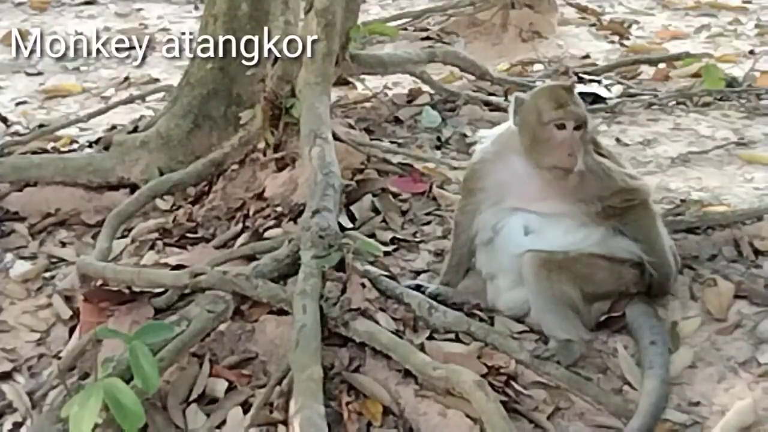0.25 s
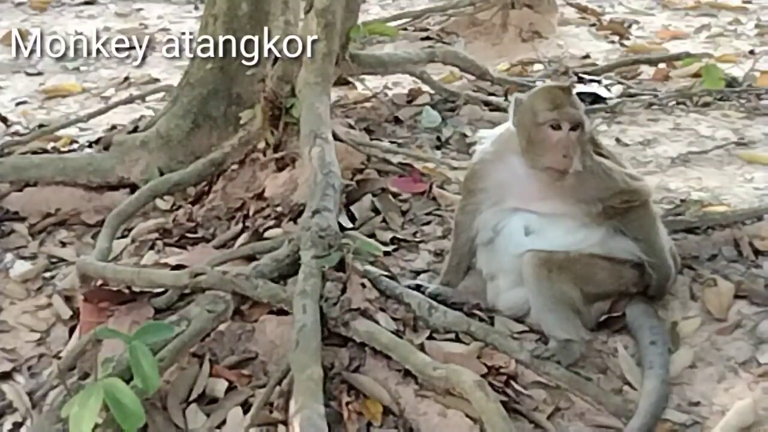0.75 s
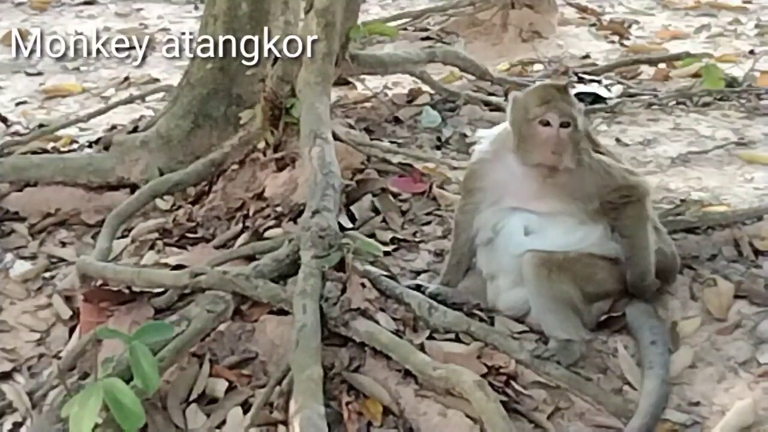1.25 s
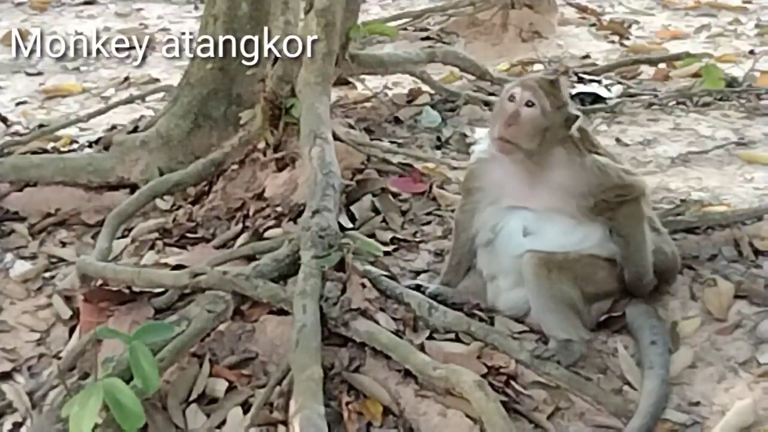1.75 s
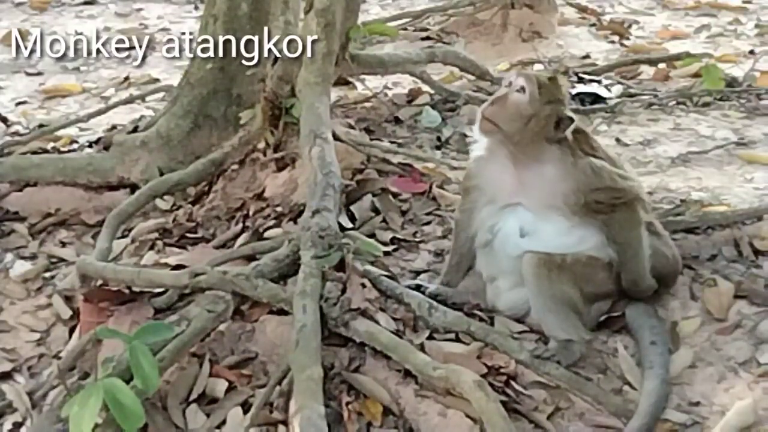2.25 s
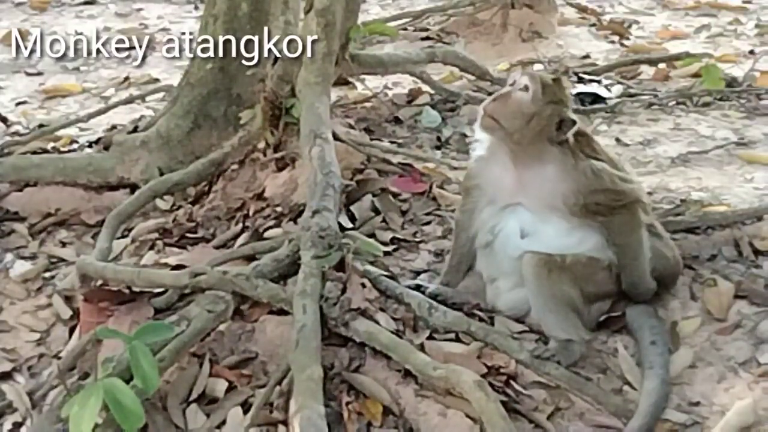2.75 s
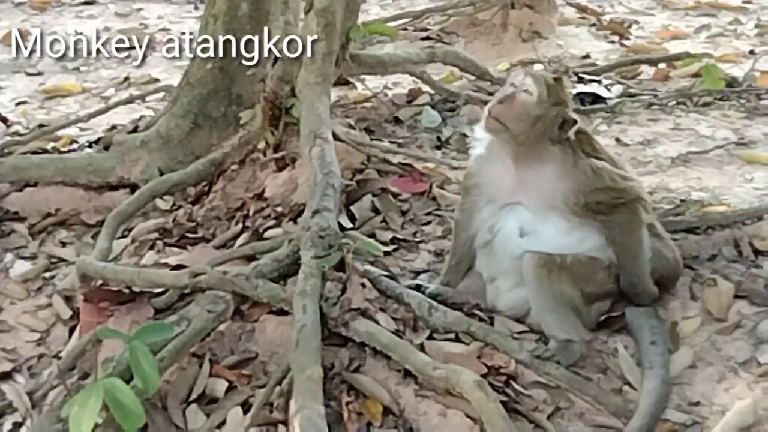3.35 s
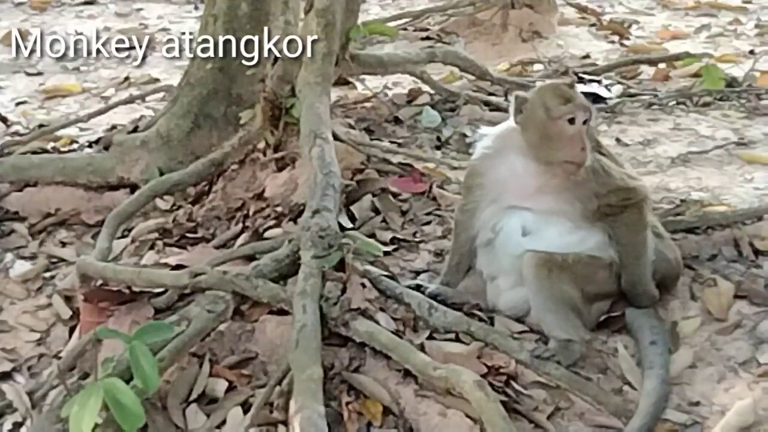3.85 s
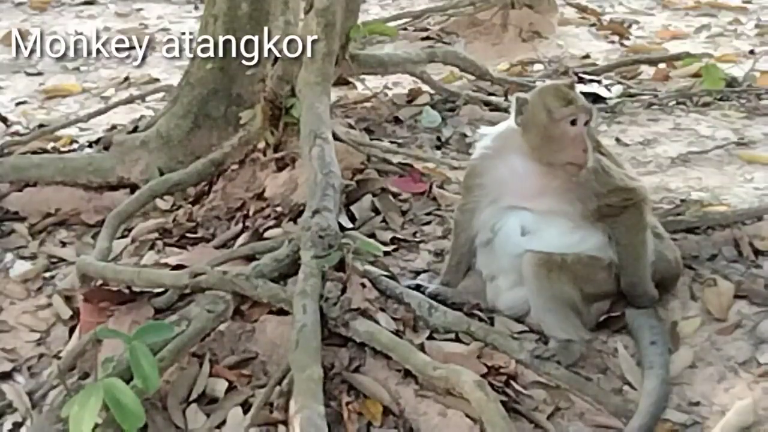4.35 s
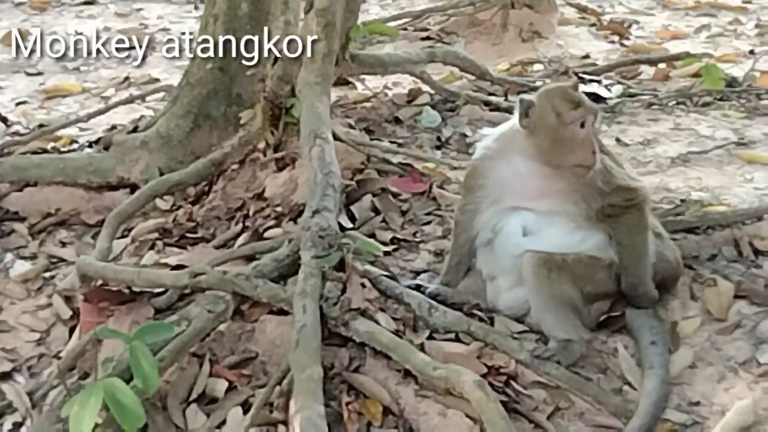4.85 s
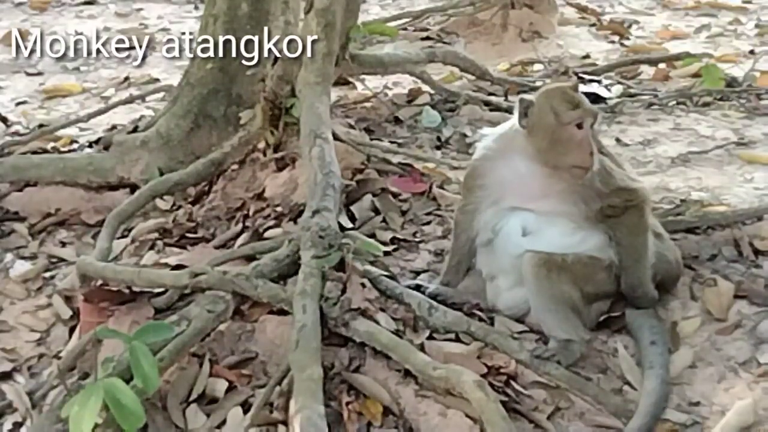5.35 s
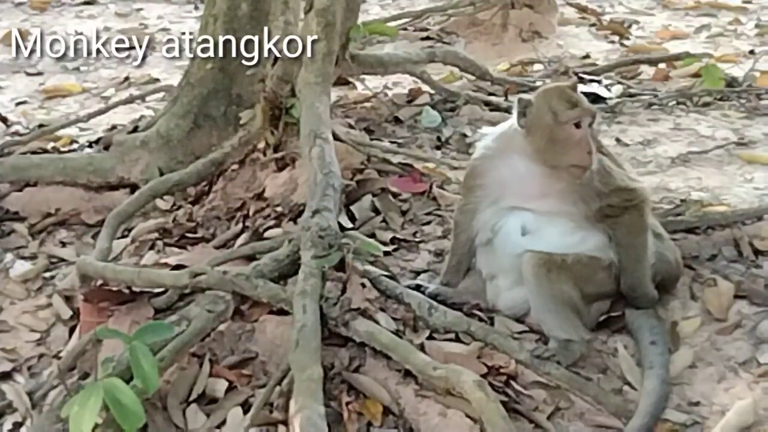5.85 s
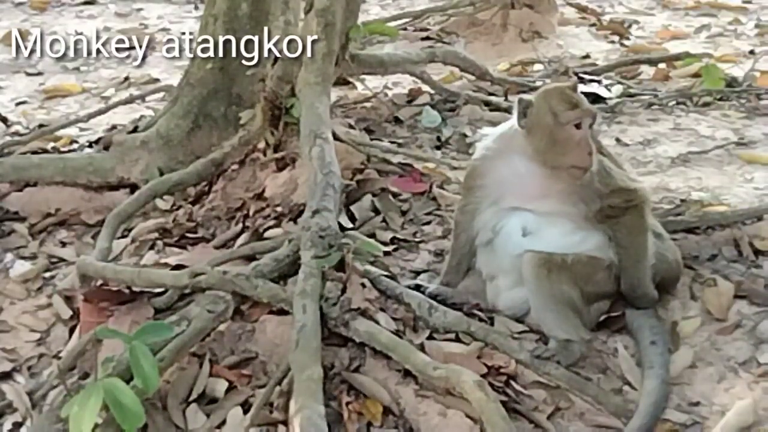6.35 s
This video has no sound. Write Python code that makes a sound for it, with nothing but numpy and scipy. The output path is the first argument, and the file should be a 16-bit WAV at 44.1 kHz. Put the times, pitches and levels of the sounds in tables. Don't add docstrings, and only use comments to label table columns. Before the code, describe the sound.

A distant engine drones throughout, a low buzzing hum around 140 to 175 Hz over soft deep rumble and dull leaf hiss. It is fullest in the first second, then recedes and wavers. The treble is mostly shut by the phone's noise suppression, opening briefly around sounds. Faint chips dot the background. At 2.3 s a small bird makes a quick rising whistle, about 4 to 6.5 kHz, blurred by woodland echoes; a fainter one answers at 3.3 s. Tiny casing clicks occur near 2.2, 2.5 and 3.2 s. From 3.85 s a hand shifts on the phone, very close: a loud snap at 4.1, scratchy rubs from 4.25, another hard snap at 4.62, and a swelling scrape around 4.85, with dull bumps and many ticks between. By 5.3 s it thins out; faint high chirping follows, a small click and bump at 5.83, then soft palm rustle over the drone until 6.6 s.

```python
import sys
import numpy as np
from scipy import signal
from scipy.fft import rfft, irfft, next_fast_len
from scipy.io import wavfile
from scipy.ndimage import uniform_filter1d, minimum_filter1d, map_coordinates

SR = 44100
rng = np.random.default_rng(int(sys.argv[2]) if len(sys.argv) > 2 else 0)


def wav_out(sig):
    wavfile.write(sys.argv[1], SR, np.round(np.clip(np.atleast_2d(sig).T, -1, 1) * 32767).astype(np.int16))


def elevation(decibels):
    levels = np.asarray(decibels, float)
    return 10 ** (levels / 20)


N = 290619


def unit(x):
    return x / np.sqrt(np.mean(x ** 2) + 1e-20)


def along(points, hz):
    f, v = np.transpose(points)
    return np.interp(np.log(hz + 1), np.log(f + 1), v)


def curves(rows):
    s, *cols = np.transpose(rows)
    return [np.interp(np.arange(N) / SR, s, c) for c in cols]


def wobble(rate):
    at = np.arange(0, N + 32, 32)
    knots = rng.standard_normal(N // 200)
    return np.interp(np.arange(N), at, map_coordinates(knots, [at * rate / SR]))


def filtered(x, response):
    m = next_fast_len(N + SR // 2)
    return irfft(rfft(x, m) * response(np.fft.rfftfreq(m, 1 / SR)), m)[..., :N]


def mode(f, hz, width_hz):
    return 1j * f * width_hz / (hz * hz - f * f + 1j * f * width_hz)


def rush(spectrum):
    return unit(filtered(rng.standard_normal(N), lambda hz: elevation(along(spectrum, hz))))


# (frequency [Hz], density [dB per Hz])
RUMBLE = [(20, -53.5), (45, -34), (85, -11.5), (150, 3), (250, -6.5), (400, -15.5), (700, -22.5),
          (1500, -61), (2500, -120)]
# (frequency [Hz], density [dB per Hz])
DEEP = [(20, -42), (45, -16.5), (65, -7), (85, 2.5), (115, -2), (160, -41.5), (300, -120)]
# (frequency [Hz], density [dB per Hz])
LEAVES = [(150, -29), (400, -6), (800, -4.5), (1250, -6.5), (1500, 2), (1750, -6), (2200, -13),
          (2600, -19.5), (3300, -25), (5000, -32), (7300, -36), (10000, -50), (16000, -51)]


def roar():
    t = np.arange(N) / SR
    start_db, fade_s, creep_db_per_s = 4.5, 0.94, 0.1281
    swell_db = start_db * np.exp(-t / fade_s) + creep_db_per_s * t
    rumble = elevation(-53 + swell_db + 2.6 * wobble(4.2)) * rush(RUMBLE)
    deep = elevation(-64.0 + 1.0 * t + 1.6 * wobble(3)) * rush(DEEP)
    leaves = elevation(-55.5 + 0.52 * swell_db + 1.0 * wobble(4.9)) * rush(LEAVES)
    return rumble + deep + leaves


# (time [s], firing rate [Hz], exhaust note [dB], share of the note in the fifth order [0-1])
ENGINE = [(0, 28.5, -43, .2), (.22, 28.6, -45.5, .85), (.6, 28.8, -42, .04), (1.15, 28.62, -45, .03),
          (1.43, 28.7, -51, .7), (1.71, 28.6, -50, .7), (1.89, 28.81, -44, .15), (2.18, 28.67, -53, .2),
          (2.37, 28.43, -44, .2), (2.51, 28.8, -57, .25), (2.66, 28.4, -45, .15), (2.94, 28.52, -48.5, .05),
          (3.12, 28.65, -57, .6), (3.3, 28.5, -53.5, .1), (5.1, 28.87, -57.5, .7), (5.45, 29, -52.5, .1),
          (5.69, 28.89, -59.5, .55), (6.4, 28.4, -51, .6)]
# (multiple of firing rate [-], level [dB])
WEAK_ORDERS = [(2, -77.5), (3, -63.5), (4, -61), (7, -57), (8, -64), (9, -61), (10, -65.5), (11, -71),
               (12, -68), (13, -72), (14, -79.5)]


def engine():
    rate, note_db, share = curves(ENGINE)
    share = np.clip(share, 0, 1)
    turn = 2 * np.pi * np.cumsum(rate) / SR
    fifth = np.sqrt(share) * np.sin(5 * turn + 0.3 * wobble(4))
    sixth = np.sqrt(1 - share) * np.sin(6 * turn + 0.3 * wobble(4))
    swell_db = 0.58 * (uniform_filter1d(note_db, SR) + 47)
    weak = np.zeros(N)
    for k, db in WEAK_ORDERS:
        weak += elevation(db + swell_db + 3.5 * wobble(2.8)) * np.sin(k * turn + 1.3 * wobble(4.5))
    return np.sqrt(2) * (elevation(note_db) * (fifth + sixth) + weak)


# (time [s], length [s],
# pitch [Hz], level [dB])
CHIPS = [(.06, .03, 8300, -91.5), (.03, .06, 3000, -82), (0.63, 0.09, 5350, -83.5),
         (1.57, .05, 12200, -99.5), (1.9, 0.11, 12100, -86), (1.73, .1, 11400, -102.5),
         (2.1, 0.053, 6100, -82), (2.17, .04, 5800, -85.5), (2.1, 0.04, 2400, -74),
         (2.662, 0.046, 5300, -85), (2.8, 0.032, 3100, -75.5), (5.346, 0.5, 2350, -74),
         (5.38, 0.45, 4600, -78), (3.947, 0.054, 4150, -68.5), (4.015, .07, 3300, -64),
         (3.947, .05, 9900, -85), (5.52, 0.14, 5320, -79.5), (5.38, 0.12, 14000, -89.5),
         (5.68, .14, 8700, -85), (5.418, 0.33, 7334, -79)]


def chips():
    t = np.arange(N) / SR
    total = np.zeros(N)
    for s, length, hz, db in CHIPS:
        shape = np.sin(np.pi * np.clip((t - s) / length, 0, 1)) ** 0.2
        tone = np.sin(2 * np.pi * hz * t + 0.46 * wobble(190))
        total += elevation(db + 6.05 * wobble(120)) * shape * tone
    return total


# (time [s], length [s], level [dB])
BIRD = [
    (2.305, 0.1673, -64.5),
    (3.317, 0.1775, -65.5),
]
# (share of its length [0-1], pitch [Hz], level [dB])
WHISTLE = [
    (0, 3950, -21),
    (0.051, 4056, -5),
    (.15, 4162, -17),
    (.28, 4610, -2),
    (.5, 5157, 0.5),
    (.72, 5750, -6),
    (.9, 6387, -7.5),
    (1, 6496, -28),
]


def bird():
    song = np.zeros(N)
    part, pitch_hz, shape_db = np.transpose(WHISTLE)
    echo_t = np.arange(SR // 2) / SR
    for s, length, db in BIRD:
        u = (np.arange(N) / SR - s) / length
        phase = 2 * np.pi * np.cumsum(np.interp(u, part, pitch_hz)) / SR
        level = (u > 0) * (u < 1) * elevation(db + np.interp(u, part, shape_db))
        whistle = level * np.sin(phase)
        echoes = rng.standard_normal(len(echo_t)) * elevation(-60 * echo_t / 0.96)
        echoes *= np.clip(echo_t / 0.023, 0.5, 1)
        echoed = signal.fftconvolve(whistle, echoes / np.linalg.norm(echoes))[:N]
        song += whistle + elevation(4.5) * echoed
    return song


def patchy(x, depth_db):
    z = signal.stft(x, nperseg=256)[2]
    field = uniform_filter1d(rng.standard_normal(z.shape), size=2, axis=0)
    field = uniform_filter1d(field, size=12, axis=1)
    return signal.istft(z * elevation(depth_db * np.clip(unit(field), -3, 1.6)), nperseg=256)[1][:N]


def band(hz, width_hz, depth_db):
    grains = rng.standard_normal(N) * elevation(1.017 * wobble(200))
    return unit(filtered(patchy(grains, depth_db), lambda f: mode(f, hz, width_hz) ** 3))


# (time [s], level [dB])
REST = [
    (5.3, -76.5),
    (5.45, -80.5),
    (5.7, -81.5),
    (5.87, -70.5),
    (6.15, -67),
    (6.59, -66.5),
]


def palm():
    db, = curves(REST)
    over_db = db + 67
    top = elevation(-79.5 + 2.6 * over_db) * band(12580, 6000, depth_db=2.9)
    body = elevation(-72 + 0.4 * over_db) * band(3101, 800, depth_db=0.47)
    body += elevation(-72.5 + 0.45 * over_db) * band(2447, 970, depth_db=4.0)
    port = band(7470, 2140, depth_db=3.0) + elevation(-11) * band(5560, 2600, depth_db=6)
    return (np.arange(N) > REST[0][0] * SR) * (elevation(db - 1.5) * port + top + body)


# (time [s], length [s], level [dB], growth along it [dB], grit against port [dB])
RUBS = [(3.854, 0.035, -83, -5.5, -13), (3.944, 0.0136, -81, -4.5, -10), (4.059, 0.0214, -54.5, 9.5, -4.5),
        (4.108, 0.0098, -56, -9, -9.5), (4.14, 0.0089, -53, 1, -6.5), (4.227, 0.0374, -52, 8, 1),
        (4.266, 0.0607, -33.5, -8, -12.5), (4.423, 0.087, -37, -7.5, -16),
        (4.547, 0.0575, -45, -6.5, -14.5), (4.622, 0.041, -46.5, -16, -5),
        (4.681, 0.033, -34.5, -7.5, -12.5), (4.723, 0.0229, -33, 5, -11.5), (4.85, 0.0505, -28.5, 14.5, -9),
        (4.945, 0.039, -65.5, -7.5, -5.5), (5.016, 0.0128, -65.5, 2.5, 0.5),
        (5.218, 0.0144, -46, -8.5, -12)]


def strokes():
    t = np.arange(N) / SR
    touch_s, lift_s = 3.845, 5.33
    attack_db_per_s, release_db_per_s = 2600.5, 1499.5
    touch_db = -83.5 + 10 * (t - touch_s) - 196.5 * np.clip(t - lift_s, 0, 1)
    port = elevation(touch_db) * (t > touch_s)
    grit = port * elevation(-5.5)
    for s, length, db, growth_db, grit_db in RUBS:
        edges_db = attack_db_per_s * np.clip(s - t, 0, 1)
        edges_db += release_db_per_s * np.clip(t - s - length, 0, 1)
        gain = elevation(db + growth_db * (np.clip((t - s) / length, 0, 1) - 0.5) - edges_db)
        port = port + gain
        grit = grit + gain * elevation(grit_db)
    return port, grit


def rubs():
    port_gain, grit = strokes()
    t = np.arange(N) / SR
    cover_s, uncover_s, move_s = 4.53, 5.0, 0.093
    cover = 0.927 * np.clip(np.minimum(t - cover_s, uncover_s - t) / move_s + 0.5, 0, 1)
    port = np.sqrt(1 - cover) * band(7090, 2100, depth_db=7.5)
    port += np.sqrt(cover) * band(6304, 2400, depth_db=3.5)
    sizzle = 1.2 * band(10600, 3600, depth_db=8.5) + 1.2 * band(13000, 5000, depth_db=7.0)
    scrape = band(4083, 2000, depth_db=4.5)
    pressed = np.sqrt(port_gain * grit) * band(1591.5, 1000, depth_db=5)
    skin = elevation(-3.22) * port_gain * port + elevation(-6.5) * grit * sizzle
    return skin + elevation(-1.57) * grit * scrape + elevation(-5.5) * pressed


# (time [s], peak [dB])
BUMPS = [(4.078, -36), (4.1016, -27), (4.2161, -37), (4.2612, -33.5), (4.3638, -39), (4.4102, -32),
         (4.5105, -63.5), (4.5889, -30), (4.6207, -40), (4.9257, -27), (5.0429, -35.5), (5.8331, -38.5)]


def bumps():
    pushes = np.zeros(N)
    for s, db in BUMPS:
        pushes[round((s - 0.0008) * SR)] = elevation(db + 38.0)

    def body(f):
        bass_cut = 1j * f / (110 + 1j * f)
        return mode(f, 190, 270) / (1 + 1j * f / 1300) * bass_cut

    return filtered(pushes, body)


# (time [s], middle [dB], low ring [dB], treble [dB], ring pitch [Hz])
SNAPS = [(2.1773, -52, -46, -62, 1620), (2.459, -54, -42.5, -66, 1720), (3.1842, -73, -36.5, -86, 1520),
         (3.2047, -44.5, -32.5, -78.5, 1592), (3.847, -40.5, -38.5, -74, 1583),
         (3.8522, -43.5, -38.5, -48.5, 1455), (4.103, -11, -6.5, -15, 1503),
         (4.2571, -29, -29, -24.5, 1500), (4.587, -40, -49, -31.5, 1480), (4.6207, -10.5, -17, -13.5, 1602),
         (4.6701, -19, -21, -21, 1549), (4.7259, -35, -24.5, -20.5, 1518), (4.747, -35.5, -25, -23.5, 1790),
         (4.8304, -43.5, -37.5, -55.5, 1554), (4.9239, -41, -36, -33.5, 1745),
         (4.9543, -47.5, -31.5, -49, 1630), (5.0411, -27, -25.5, -23.5, 1510),
         (5.0728, -41, -29.5, -34.5, 1490), (5.0824, -42, -31, -43, 1910), (5.267, -41, -31.5, -49.5, 1630),
         (5.53, -48, -93, -71.5, 1590), (5.8315, -58.5, -30.5, -47, 1795)]
# (time [s], middle [dB])
TICKS = [(3.9479, -48.5), (4.0193, -47.5), (4.2148, -44.5), (4.359, -46), (4.399, -47), (4.4086, -45.5),
         (4.546, -43.5), (4.7858, -47.5), (4.811, -48), (4.997, -50.5), (5.0174, -43), (5.108, -44.5),
         (5.1487, -44.5), (5.1622, -44.5), (5.1852, -47.5), (5.1998, -44.5), (5.2563, -41.5),
         (5.3351, -49.5)]


def snaps():
    mid, treble, ring = np.zeros((3, N + SR))
    t = np.arange(SR // 30) / SR
    ticks = [(s, db, db + 5.5, db - 6.5, 1560) for s, db in TICKS]
    for s, db, ring_db, treble_db, ring_hz in SNAPS + ticks:
        at = round(s * SR) - 16
        span = slice(at, at + len(t))
        crack = rng.standard_normal((2, len(t))) * elevation(-60 * t / 0.01413) * (1 - np.exp(-t / 0.00018))
        crack[:, 8] += 4.5
        crack = crack / np.linalg.norm(crack, axis=1)[:, None] * 4.86
        mid[span] += elevation(db + 9.0) * crack[0]
        treble[span] += elevation(treble_db + 9.0) * crack[1]
        ring_level = elevation(ring_db + 2.5 - 60 * t / 0.01267) * (1 - np.exp(-t / 0.0002))
        ring[span] += ring_level * np.sin(2 * np.pi * ring_hz * t)
    middle = filtered(mid[:N], lambda f: mode(f, 3200, 3400) ** 3)
    top = filtered(treble[:N], lambda f: mode(f, 7030, 1800) ** 2 + elevation(-7.5) * mode(f, 14500, 7000) ** 2)
    return ring[:N] + middle + top


def scene():
    wood = roar() + engine() + chips() + bird()
    hand = palm() + rubs() + bumps() + snaps()
    return (wood + hand)[None]


# (frequency [Hz], level a band must pass to open [dB])
GATE = [(1850, -105), (2050, -75.5), (2300, -76), (2700, -76.5), (3200, -80.5), (4200, -82), (5500, -86.5),
        (7300, -90.5), (9500, -99.5), (16000, -101)]


def suppress(x, hold=8, soft_db=0.3, shut_db=-34, release_db=1.0, uneven_db=1.65):
    learn_db, learn_s = 14, 0.7
    hz, t, z = signal.stft(x, SR, nperseg=512)
    power = uniform_filter1d(uniform_filter1d(np.abs(z) ** 2, size=3, axis=1), size=2, axis=0)
    level_db = 10 * np.log10(np.abs(power) + 1e-14)
    drift = uniform_filter1d(rng.standard_normal(z.shape), size=60, axis=1)
    drift = unit(uniform_filter1d(drift, size=2, axis=0))
    gate_db = along(GATE, hz)[:, None] + uneven_db * drift
    opened = 1 / (1 + np.exp((gate_db - level_db) / soft_db))
    held = -minimum_filter1d(-opened, int(hold), axis=1, origin=(int(hold) - 1) // 2)
    floor_db = shut_db + learn_db * np.exp(-t / learn_s)
    ramp = release_db * np.arange(len(t))
    gain_db = np.maximum.accumulate(floor_db * (1 - held) + ramp, axis=1) - ramp
    return signal.istft(z * elevation(gain_db), SR, nperseg=512)[1][:N]


def roll_off(x):
    return signal.sosfilt(signal.butter(12, 16830, fs=SR, output="sos"), x)


def record(dry):
    hiss = elevation(-90.5) * rush([(2000, 5), (16000, -9.0)])
    x = suppress(dry[0]) + hiss
    x = filtered(x, lambda hz: 1 / (1 + (hz / 15900) ** 60))
    return roll_off(x[None])


dry = scene()
out = record(dry)
wav_out(out)
```